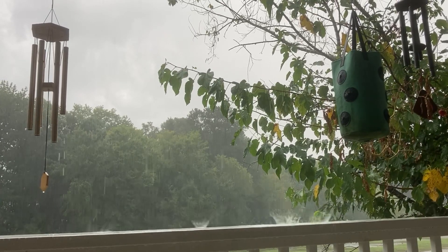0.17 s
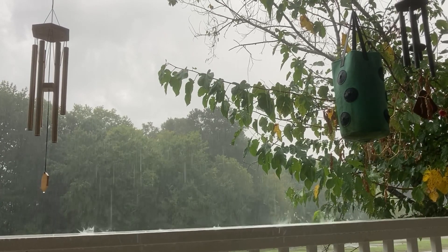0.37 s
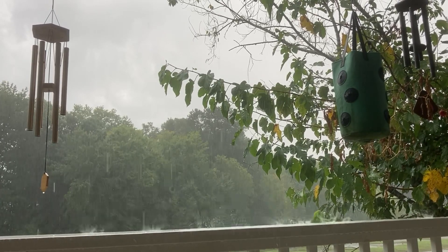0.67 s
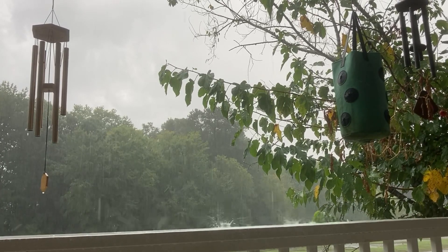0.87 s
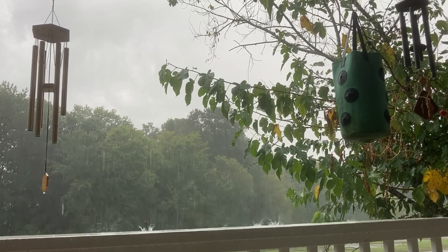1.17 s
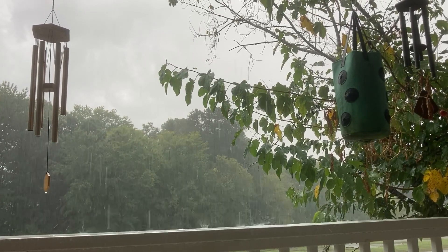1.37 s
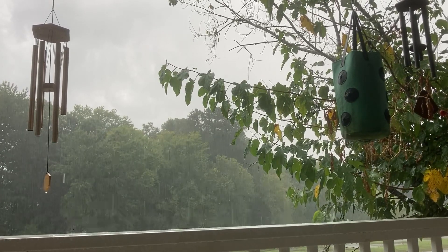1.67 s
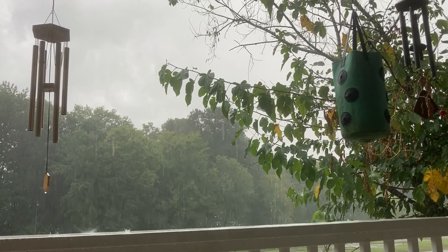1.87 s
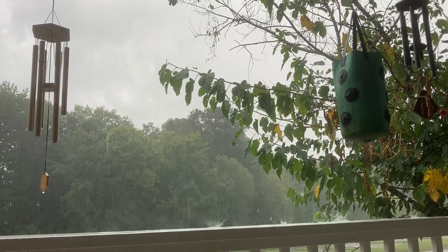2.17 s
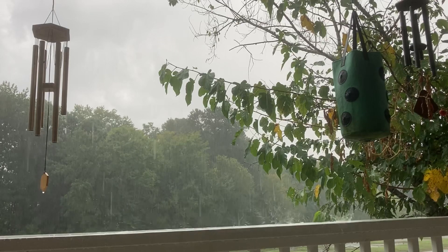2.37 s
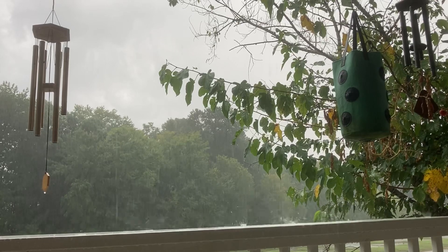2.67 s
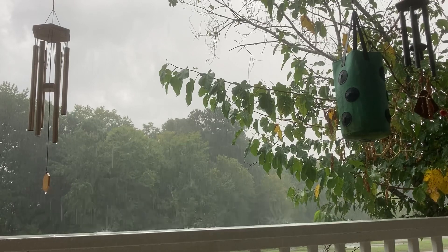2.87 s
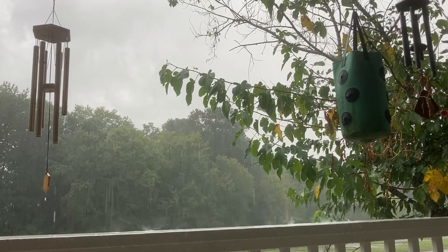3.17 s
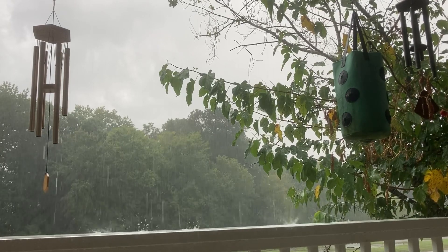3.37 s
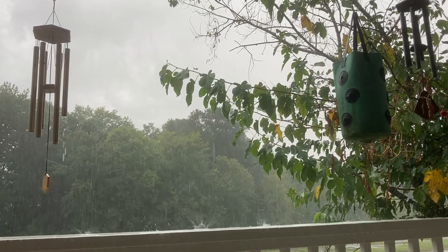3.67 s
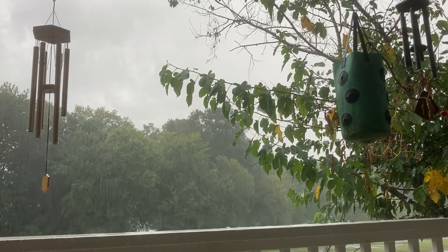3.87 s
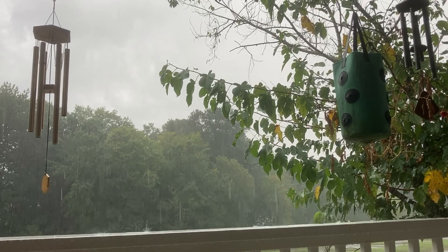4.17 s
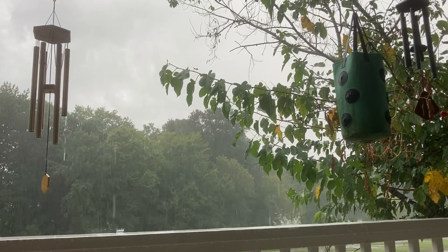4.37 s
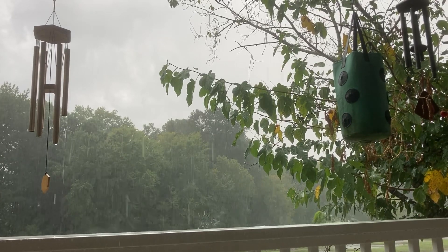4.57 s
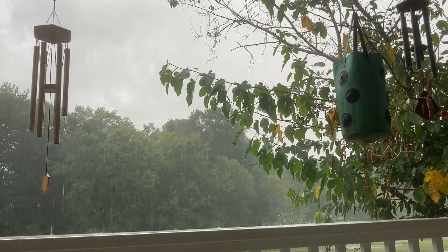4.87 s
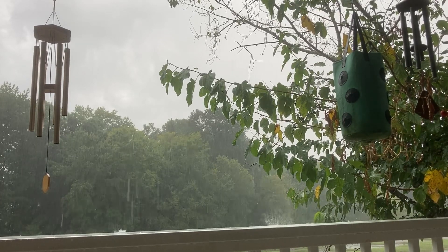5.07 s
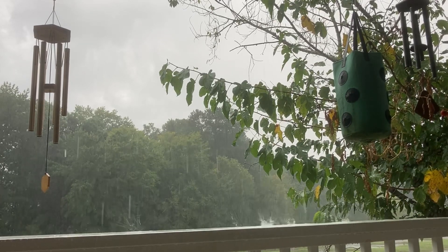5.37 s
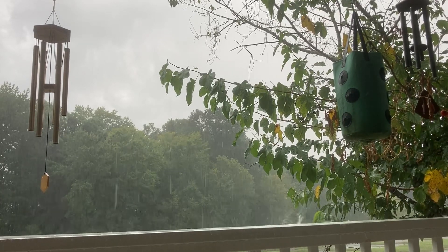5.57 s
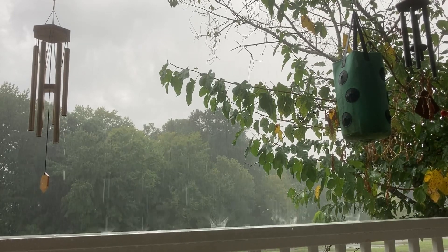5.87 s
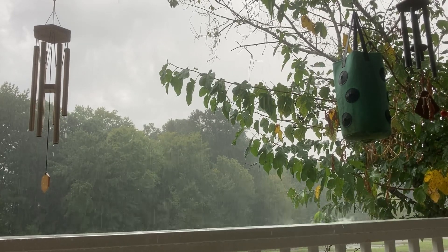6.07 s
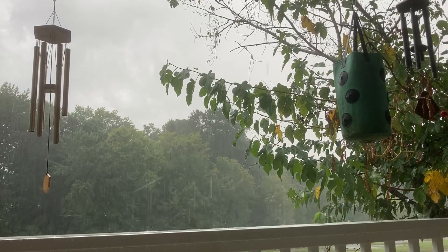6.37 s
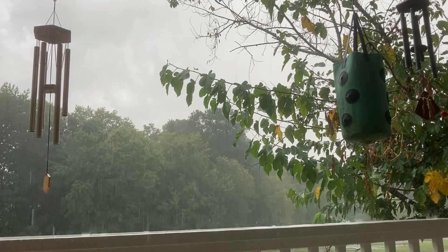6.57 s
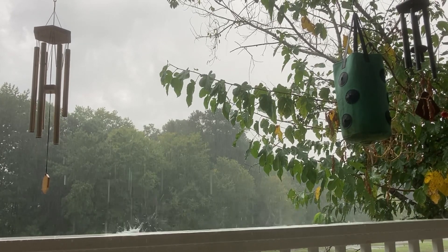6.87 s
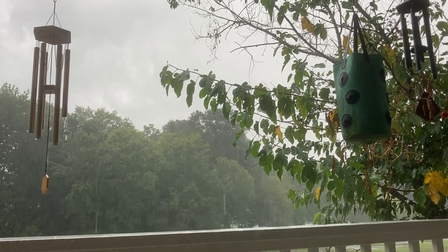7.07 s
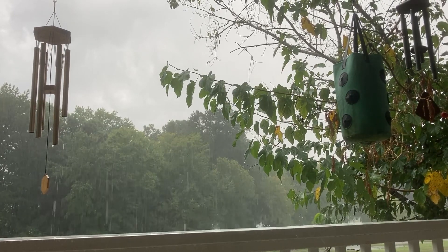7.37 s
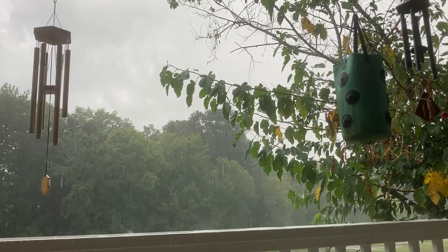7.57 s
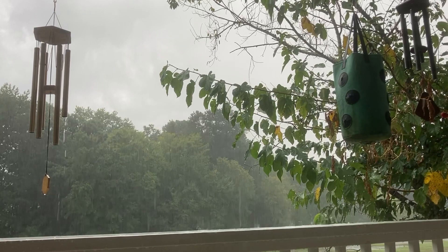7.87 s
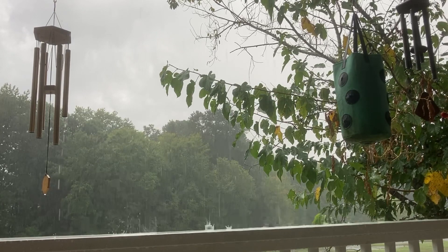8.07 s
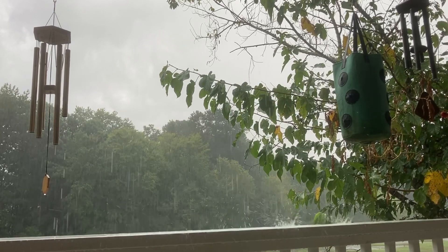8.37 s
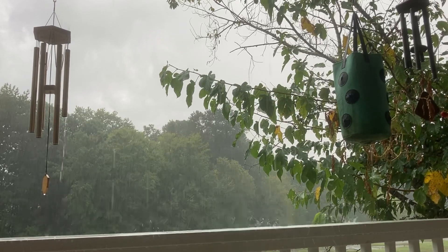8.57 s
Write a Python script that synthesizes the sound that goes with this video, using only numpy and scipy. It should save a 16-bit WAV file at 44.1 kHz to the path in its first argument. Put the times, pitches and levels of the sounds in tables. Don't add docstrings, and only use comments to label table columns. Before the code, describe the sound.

Heavy, even rain pours over a yard and trees, heard from under a porch with a close stereo microphone. Fine bright droplets patter on leaves and boards, and irregular fat drips snap and splash on the nearby railing. From the start a deep distant thunder rumbles in soft uneven lumps, strongest between about two and five seconds, then fades until only the rain remains.

```python
import sys
import numpy as np
from scipy import signal
from scipy.fft import rfft, irfft, next_fast_len
from scipy.io import wavfile
from scipy.ndimage import uniform_filter1d

SR = 44100
rng = np.random.default_rng(int(sys.argv[2]) if len(sys.argv) > 2 else 0)


def undo_db(level):
    steps = np.asarray(level, float) / 20
    return 10 ** steps


def master(y):
    cut = np.clip(np.atleast_2d(y).T, -1, 1)
    pcm = np.round(cut * 32767)
    wavfile.write(sys.argv[1], SR, pcm.astype(np.int16))


N = 384993


def evened(x):
    return x / np.sqrt(np.mean(x ** 2) + 1e-20)


def twice_smoothed(x, size, axis=-1):
    return uniform_filter1d(uniform_filter1d(x, size=size, axis=axis), size=size, axis=axis)


def wander(count, size):
    return evened(twice_smoothed(rng.standard_normal(count), size))


def read(hz, points, column=1):
    points = np.asarray(points)
    return np.interp(np.log(hz + 1), np.log(points[:, 0]), points[:, column])


def resonate(x, hz, width_hz):
    r = np.exp(-np.pi * width_hz / SR)
    return 2 * signal.lfilter([1 - r], [1, -r * np.exp(2j * np.pi * hz / SR)], x).real


def steep(x, hz, width_hz):
    return resonate(resonate(x, hz, width_hz), hz, width_hz)


def add(mix, s, sound):
    part = mix[:, round(s * SR):][:, :sound.shape[1]]
    part += sound[:, :part.shape[1]]


def rain(level_db=-37, patchy_db=0.67, grain_db=2.0, swell_db=0.06, flicker_db=0.95):
    # f/Hz, level/dB per Hz
    wash_colour = [(30, -75), (60, -70), (200, -67), (500, -76), (1000, -75), (1600, -75.5), (2500, -75.5),
                   (4300, -77.5), (5600, -80), (6600, -84), (8400, -80.5), (10000, -80.0), (12500, -83.5),
                   (15500, -90)]
    frames, hz = N // 256 + 5, np.fft.rfftfreq(1024, 1 / SR)
    noise = rng.standard_normal((frames, 513, 6)).T

    patches = uniform_filter1d(uniform_filter1d(noise[4], size=14, axis=0), size=12, axis=1)
    clusters = uniform_filter1d(uniform_filter1d(noise[5], size=3, axis=0), size=5, axis=1)
    flicker = evened(uniform_filter1d(rng.standard_normal(frames), size=4))
    nearness = np.clip(hz / 9000, 0, 1)[:, None]

    bins_db = read(hz, wash_colour)[:, None] + patchy_db * evened(patches) + grain_db * evened(clusters)
    bins_db = bins_db + swell_db * wander(frames, 60) + flicker_db * nearness * flicker
    spectra = (noise[:2] + 1j * noise[2:4]) * undo_db(bins_db)
    wash = signal.istft(spectra, nperseg=1024, noverlap=768)[1]
    return undo_db(level_db) * evened(wash[:, :N])


def spray(level_db=-51.5, per_s=500, spread_db=3.0):
    size = undo_db(spread_db * np.minimum(rng.exponential(1, N), 3))
    size = size * (rng.random(N) < per_s / SR)
    kind = rng.integers(0, 12, N)
    t, out = np.arange(300) / SR, np.zeros((2, N))
    for k, hz in enumerate(np.geomspace(2500, 14000, 12)):
        ringing = np.array([resonate(v, hz, 1.8 * hz) for v in rng.standard_normal((2, 300))])
        grain = np.exp(-t / 0.0016) * ringing
        out += signal.oaconvolve((size * (kind == k))[None], grain, axes=1)[:, :N]
    return undo_db(level_db) * evened(out)


def gusts(level_db=-63, swing_db=9.5, hz=7000, width_hz=1600):
    swing = wander(N, 3000)
    hiss = evened(steep(rng.standard_normal((2, N)), hz, width_hz))
    return undo_db(level_db + swing_db * np.clip(swing, -3, 1.5)) * hiss


def booms(t, hz, half_s=.036, reach_octaves=.55, lull_db=-5):
    # t/s, level over the roll/dB, f/Hz
    boom_table = [(.3, 0, 70), (.68, -4, 70), (1.15, -2, 120), (1.3, -5, 120), (1.62, -8, 62),
                  (1.88, 5, 114), (1.98, -1, 70), (2.1, 0.5, 62), (2.22, -8, 62), (2.27, -4, 120),
                  (2.43, 4, 66), (2.6, -7, 144), (2.73, -8, 115), (2.86, -8, 62), (3.01, -6, 62.3),
                  (3.17, -2.5, 150), (3.45, -17, 68), (3.63, -6, 119), (3.94, -7, 62), (4.31, 3, 120),
                  (4.47, 4.5, 93), (4.65, -4, 115), (4.91, -1, 68), (5.08, -5.5, 185), (5.22, -5, 62),
                  (5.38, -6, 62), (5.64, -5, 62), (5.87, -9, 135), (6.06, -6, 62), (6.41, -8, 62)]
    s, db, pitch_hz = np.transpose(boom_table)[:, :, None]
    in_time = ((t - s) / half_s) ** 2
    in_pitch = (np.log2(hz / pitch_hz) / reach_octaves) ** 2
    return undo_db(lull_db) + (undo_db(db) * np.exp(-in_time - in_pitch)).sum(0)


def thunder(per_s=400, steady=.56, dip_hz=98, dip_width_hz=12):
    # t/s, level/dB, brightness/dB per group of hollows
    roll_course = [(0, -34.5, -2), (.7, -33, 0.5), (1.25, -35.5, -1), (1.6, -33.5, 0.5), (2.1, -32.5, 0),
                   (2.5, -30, 1), (3.1, -33, 2.5), (3.5, -34.5, 1), (4.1, -35, 0), (4.45, -33, 2),
                   (5.0, -33.5, 3.5), (5.45, -35, 0.5), (5.8, -39.5, 4.5), (6.2, -40.5, -0.5),
                   (7, -42, -4.5), (8.2, -46, -10.5), (8.45, -54, 3), (8.73, -60, 15)]
    # f/Hz, width/Hz, level/dB
    porch_hollows = [
        [(49.6, 7.8, -2), (64.6, 11.6, 4), (77.3, 2.9, -4)],
        [(111.7, 7.6, -0.5), (127.9, 6.7, 0)],
        [(170.8, 9.4, 2), (198.2, 12.1, -1), (222.1, 15, -9), (285, 81, -14.5)],
    ]
    group_db = [3, -4, -10]
    s, loud_db, bright_db = np.transpose(roll_course)
    length = next_fast_len(N)
    t, hz, out = np.arange(N) / SR, np.fft.rfftfreq(length, 1 / SR), np.zeros((2, N))
    steps = rfft(rng.standard_normal((2, N)) * (rng.random((2, N)) < per_s / SR), length)
    coarse = t[::128]

    for k, hollows in enumerate(porch_hollows):
        body = sum(undo_db(peak_db) / (1 + 1j * (hz - f) / (0.85 * width)) ** 2 for f, width, peak_db in hollows)
        roll = evened(irfft(steps * body, length)[:, :N])
        lumps = np.sqrt(abs(twice_smoothed(roll ** 2, 1800)) + .01)
        loudest_hz = max(hollows, key=lambda hollow: hollow[-1])[0]
        course_db = np.interp(coarse, s, loud_db + group_db[k] + k * bright_db)
        gain = undo_db(course_db) * booms(coarse, loudest_hz)
        out += np.interp(t, coarse, gain) * evened(roll / lumps ** steady)

    dip = 1 - 0.28 / (1 + ((hz - dip_hz) / dip_width_hz) ** 2)
    return irfft(rfft(out, length) * dip, length)[:, :N]


def drip(noise, hz, splash_db, fizz_db, tick_db=None):
    if tick_db is None:
        tick_db = max(splash_db, fizz_db) + 11
    t = np.arange(noise.shape[-1]) / SR
    ring = evened(steep(noise[0], hz, .38 * hz))
    fizz = evened(steep(noise[1], 10000, 7700))

    landing = np.zeros(len(t))
    landing[[40, 55, 80]] = 1, .4, .8
    overtone = 0.92 / (1 + (hz / 5600) ** 6)
    knock = evened(steep(landing, hz, 0.31 * hz))
    knock = knock + overtone * evened(steep(landing, 1.62 * hz, 0.51 * hz))
    snap = evened(steep(landing * (t < .0014), 11500, 6000))
    tick = undo_db(splash_db) * knock + undo_db(fizz_db - 3) * snap

    droplets = undo_db(3.5 * evened(uniform_filter1d(noise[2, 0], size=60)))
    splash = (1 - np.exp(-(t / 0.002) ** 2)) * np.exp(-t / .024) * droplets
    splash_sound = splash * (undo_db(splash_db) * ring + undo_db(fizz_db - 5.5) * fizz)
    return undo_db(tick_db - 10) * tick / abs(tick).max() + undo_db(-2.5) * splash_sound


def eaves():
    # t/s, ring f/Hz, splash level/dB, fizz level/dB, tick peak level/dB
    fat_drips = [(0.2082, 4800, -39, -29, -6), (1.6923, 4230, -28, -29.5, -2.5),
                 (4.6129, 6500, -34, -41, -23), (4.818, 2800, -28, -29, -10), (5.325, 8550, -43, -30, -10),
                 (6.0025, 5030, -31, -28, -10), (7.107, 4020, -34.5, -32, -20),
                 (7.4697, 8050, -47, -26, -9), (8.281, 6840, -27, -32, -7), (8.2806, 3400, -35.5, -50, -19)]
    # t/s, ring f/Hz, splash level/dB, fizz level/dB
    small_drips = [(.0794, 3970, -46, -30), (0.662, 3890, -51, -31), (.692, 6290, -39, -33),
                   (7.726, 2550, -38.5, -45), (.898, 4770, -34.5, -35), (1.127, 3680, -44, -25),
                   (1.235, 3710, -43, -30), (1.511, 8140, -37, -33), (2.0203, 5060, -35, -35),
                   (.97, 6000, -49, -43), (2.6194, 3990, -41, -32), (2.6554, 3910, -39, -30),
                   (2.688, 3320, -46, -32), (3.073, 3220, -32.5, -30), (3.254, 4960, -37, -30),
                   (3.315, 4730, -41, -29), (3.855, 4590, -36, -37), (4.834, 8000, -45, -33),
                   (5.038, 3170, -46, -30), (5.063, 4760, -36, -36), (5.7394, 3890, -48, -29.5),
                   (5.7544, 4350, -34.5, -38), (5.9294, 4090, -43, -32), (6.0594, 4060, -56, -31),
                   (6.4446, 4130, -35, -31), (7.026, 3320, -38.5, -47), (7.21, 3250, -48, -31),
                   (7.875, 2080, -38.5, -43), (8.294, 7250, -45, -24.5), (8.477, 4800, -37, -32)]
    every_drip = fat_drips + small_drips
    out = np.zeros((2, N))
    for noise, (s, *row) in zip(rng.standard_normal((len(every_drip), 3, 2, 2800)), every_drip):
        add(out, s, drip(noise, *row))
    return out


def ports(field, loose, stray, wander_s=2.5e-6, shared_hz=6350):
    # f/Hz, likeness/0-1, right port's lead/rad, left-right level/dB
    pair = [(40, .99, 0, -1.5), (70, .96, 0, -1.5), (125, .93, 0, -4.5), (250, .85, -.1, -1.5),
            (600, .5, -.45, 0), (1350, .12, .5, .3), (1800, .5, 2.4, .2), (2700, .08, 0, 0),
            (4200, .2, .3, 0), (5700, .25, -2.9, 0)]
    half_turns_hz = [5140, 6960, 9060, 11200, 13760, 15350, 18000]
    length = next_fast_len(N)
    hz = np.fft.rfftfreq(length, 1 / SR)
    turn = np.pi * (np.interp(hz, half_turns_hz, np.arange(len(half_turns_hz))) - 1)
    shared = np.clip((hz - shared_hz) / 500 + .5, 0, 1)
    tight = np.clip(1 - stray - loose * np.sin(turn) ** 4, 0, 1)
    alike = (1 - shared) * read(hz, pair) + shared * tight
    treble_lead = turn - 0.65 * np.sin(2 * turn) + 0.1 * np.sin(turn)
    lead = np.where(shared > 0, treble_lead, read(hz, pair, column=2))
    tilt = undo_db(read(hz, pair, column=3) / 2)

    left, other = rfft(field, length)
    right = alike * np.exp(1j * lead) * left + np.sqrt(1 - alike ** 2) * other
    slope = 2j * np.pi * hz * right * shared * np.cos(turn / 2) ** 2
    left, right, slope = irfft(np.array([left * tilt, right / tilt, slope]), length)[:, :N]
    drift = wander(N, 2500)
    return np.array([left, right + wander_s * drift * slope])


def scene():
    far = ports(rain() + thunder(), loose=0.45, stray=0.0007)
    near = ports(spray() + eaves(), loose=0.6, stray=0.012)
    return far + near + gusts()


def band_limit(x):
    return signal.sosfilt(signal.butter(12, 16930, fs=SR, output="sos"), x)


def record(dry, low_cut_hz=38, edge_hz=15860):
    length = next_fast_len(N)
    hz = np.fft.rfftfreq(length, 1 / SR)
    band = (hz < edge_hz) / np.sqrt(1 + (low_cut_hz / (hz + 1)) ** 8)
    mix = irfft(rfft(dry, length) * band, length)[:, :N]
    return band_limit(mix)


dry = scene()
out = record(dry)
master(out)
```